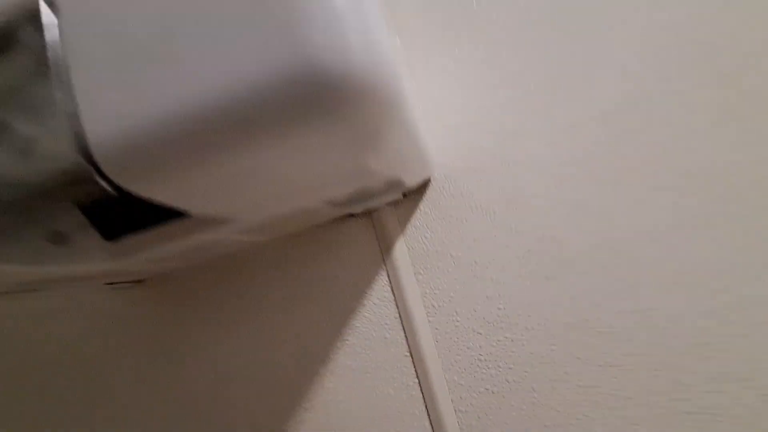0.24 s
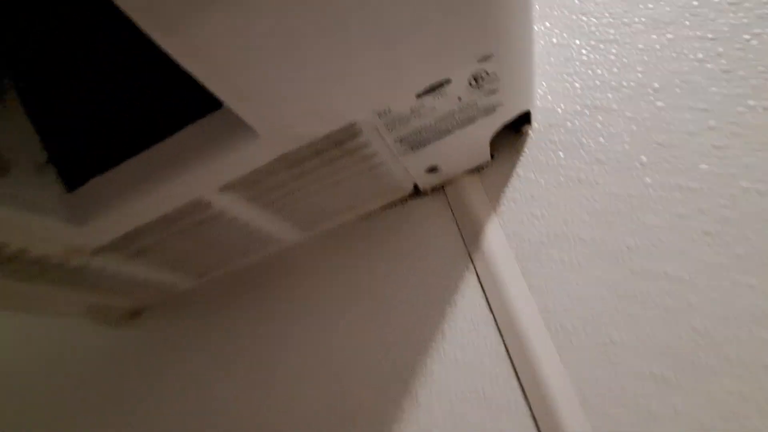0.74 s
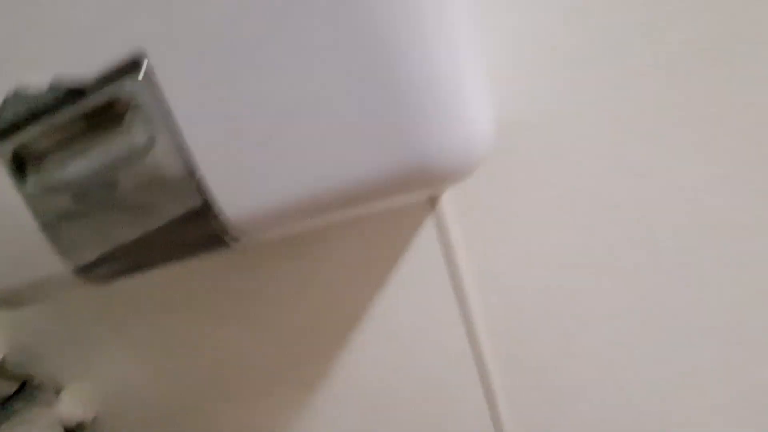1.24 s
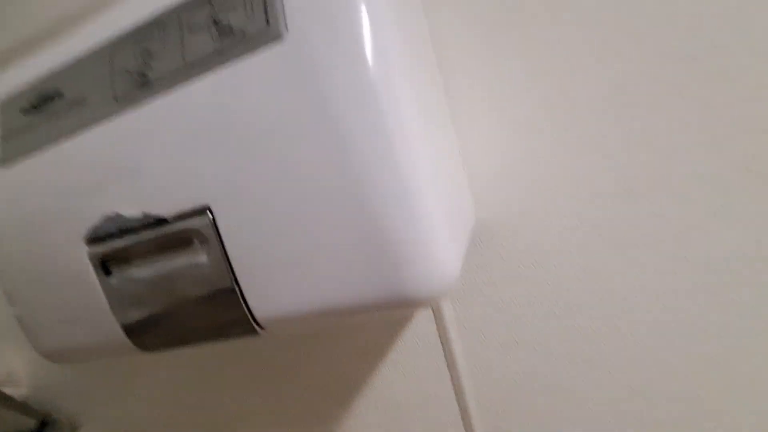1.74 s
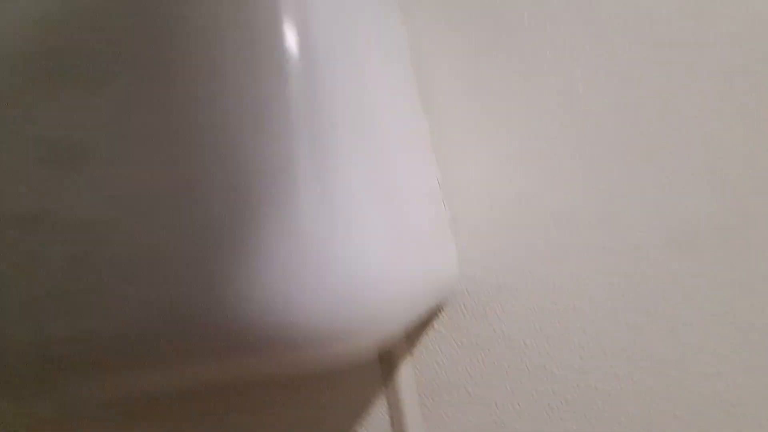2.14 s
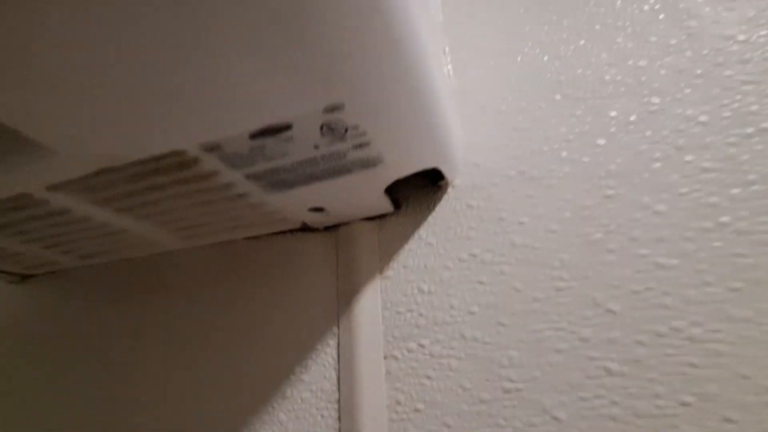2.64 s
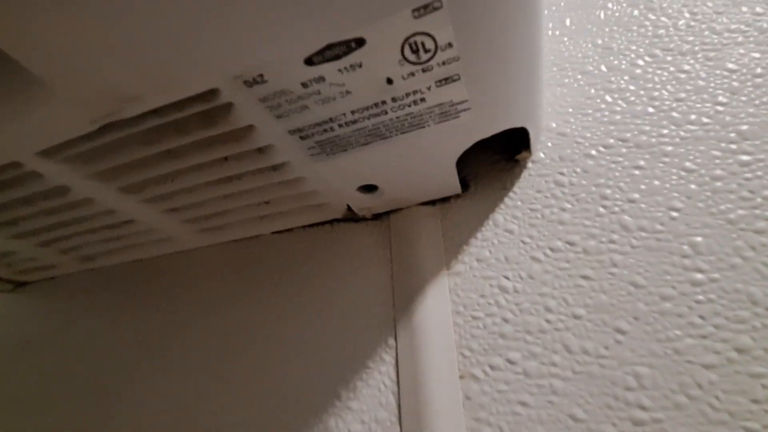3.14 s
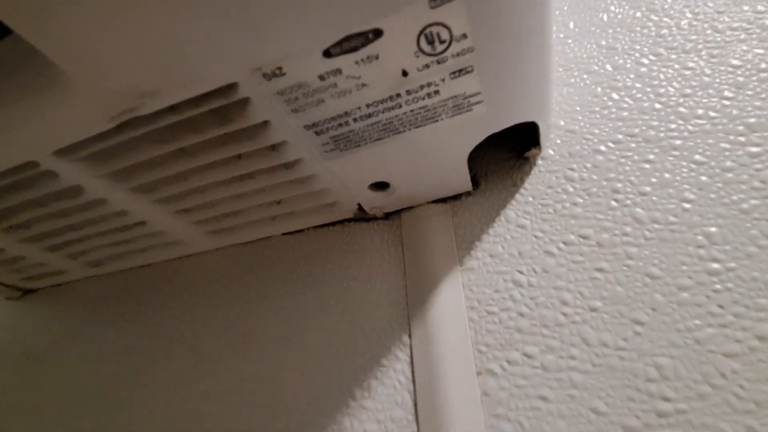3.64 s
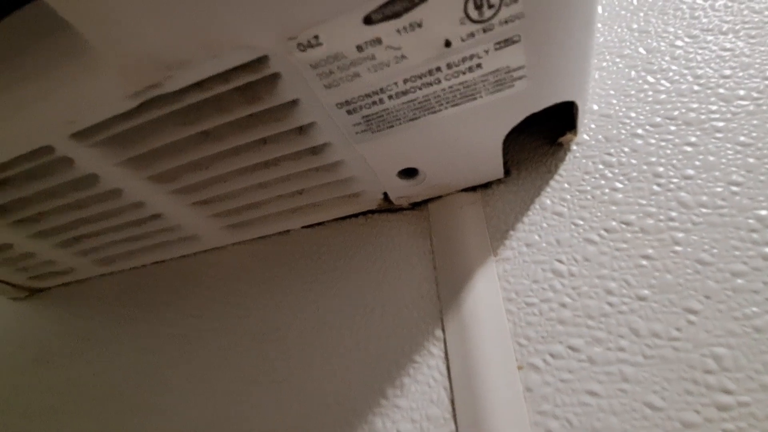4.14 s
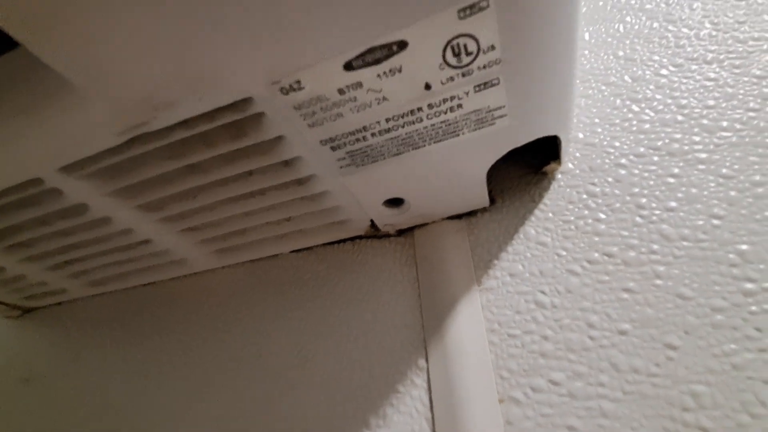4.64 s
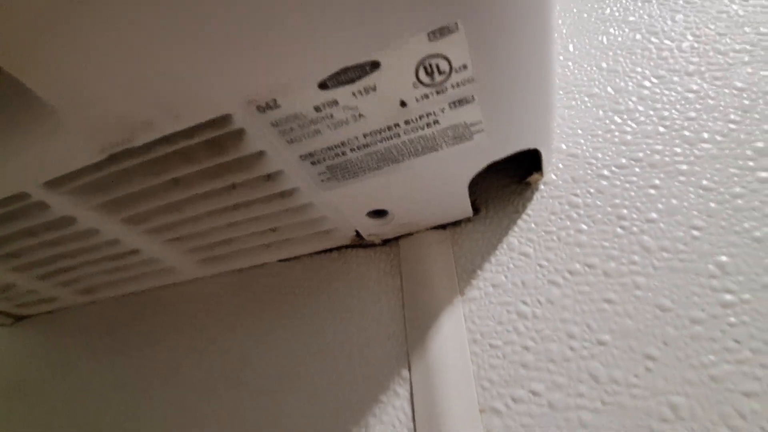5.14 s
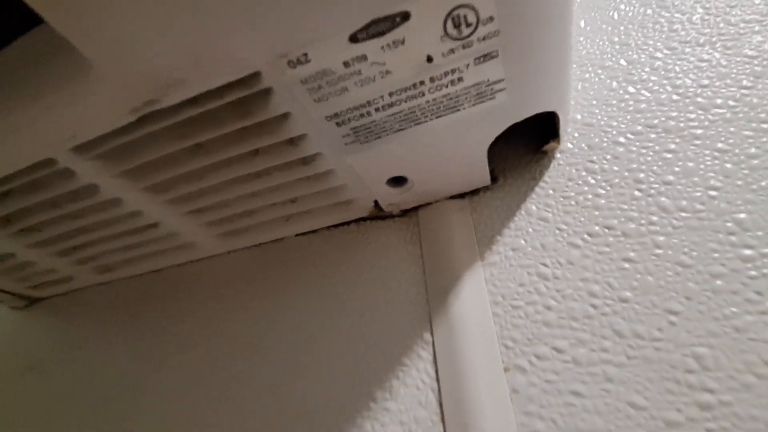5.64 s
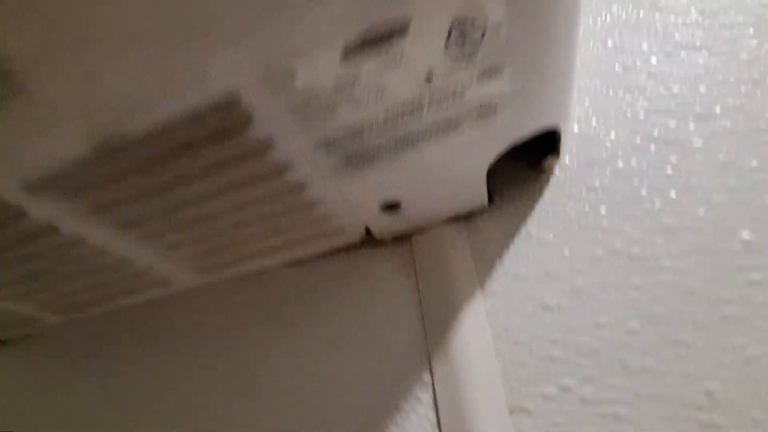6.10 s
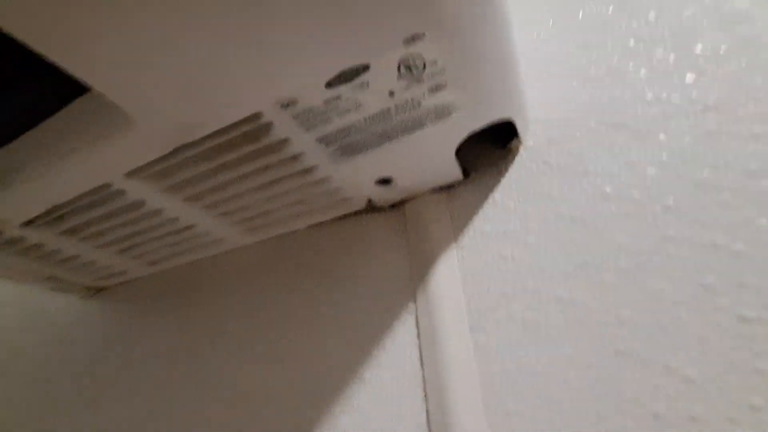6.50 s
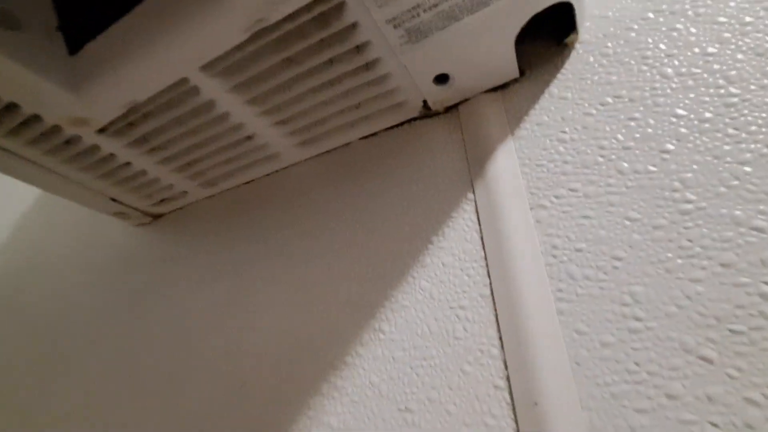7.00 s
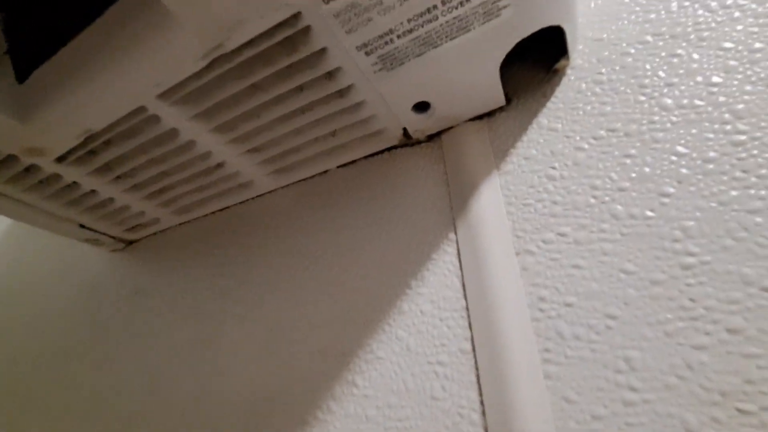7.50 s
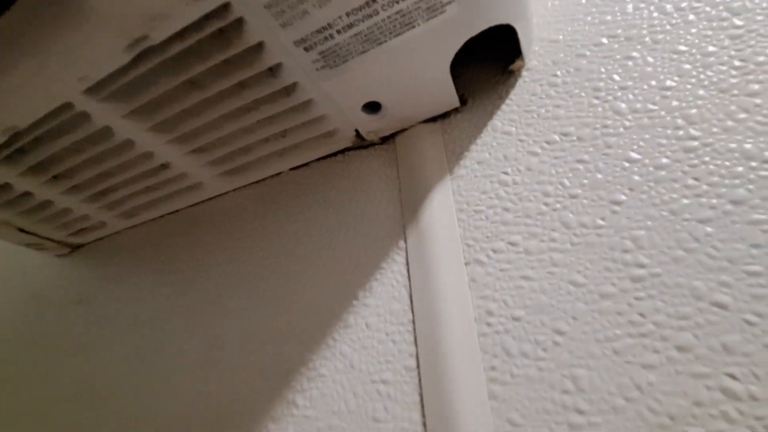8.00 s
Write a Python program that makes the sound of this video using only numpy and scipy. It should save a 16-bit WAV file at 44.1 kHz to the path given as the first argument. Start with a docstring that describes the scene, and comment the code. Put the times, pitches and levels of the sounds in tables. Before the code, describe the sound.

A hand dryer twice snaps on, blows with a buzzing rush of air and coasts down, over a ceiling fan's hum in a small restroom.

```python
"""Hand dryer in a small restroom.

An exhaust fan hums. Twice the wall dryer's motor snaps on, buzzes and rasps up to speed, blows, then coasts
down with its brushes swishing. A hand-held microphone moves about the housing, near the intake. Fingers rub its
case, gusts buffet it, and its gain control ducks the fan and lets it swell back."""
import sys
import numpy as np
from scipy import signal
from scipy.fft import rfft, irfft
from scipy.io import wavfile
from scipy.ndimage import minimum_filter1d

SR = 44100
rng = np.random.default_rng(int(sys.argv[2]) if len(sys.argv) > 2 else 0)


def transcribe(u):
    """Save the signal u as a 16-bit wav file named by the first command-line argument.

    u: samples, shape (n,) or (channels, n), limited to [-1, 1]; the rate is SR.
    q: integer samples, one column per channel.
    """
    v = np.clip(np.atleast_2d(u).T, -1, 1)
    q = np.round(v * 32767).astype(np.int16)
    wavfile.write(sys.argv[1], SR, q)


N = 364266
TIME_S, FREQS_HZ = np.arange(N) / SR, np.fft.rfftfreq(N, 1 / SR)
PULL_HZ, FAN_SHAFT_HZ, DRYER_TOP_HZ = 120.03, 24.01, 100.3  # magnetic pull is at twice the mains

# Noise spectra. Each row: frequency in Hz, relative density in dB.
FAN_AIR_DB = [(25, -87), (60, -59.5), (200, -64), (300, -56.5), (420, -61.5), (700, -62.5), (900, -75),
              (1400, -70.5), (2600, -79), (4700, -77.5), (7000, -86.5), (9300, -95.5), (12700, -92),
              (15800, -106)]
RUB_DB = [(30, -61), (150, -62), (450, -59), (900, -64), (1500, -61), (2800, -74.5), (4600, -66),
          (9000, -87), (12800, -69.5), (15800, -84)]
BUFFET_DB = [(20, -68), (45, -31.5), (70, -31), (120, -43), (250, -60), (600, -80), (2000, -120)]
RASP_DB = [(60, -48), (300, -49.5), (380, -44), (480, -39), (650, -57), (800, -48.5), (1300, -52),
           (2000, -61.5), (3300, -65), (3900, -59), (6200, -62.5), (9000, -67.5), (13000, -65),
           (15800, -74)]
BRUSH_DB = [(100, -64), (220, -64), (500, -60), (1500, -67.5), (3200, -75), (4200, -63), (6000, -65),
            (9000, -75.5), (12700, -69.5), (15800, -77)]
RUSH_DB = [(25, -63), (60, -46.5), (120, -34.5), (220, -29), (340, -38.5), (560, -40), (730, -44.5),
           (1300, -47.5), (3100, -53), (4000, -51), (5400, -51.5), (9200, -61), (12600, -56), (15800, -65)]
# Harmonics of the magnetic pull or of a shaft. Each row: multiple, relative level in dB.
FAN_HUM_DB = [(1, -25), (2, -35.5)]
FAN_BUZZ_DB = [(3, -32.5), (4, -42.5), (5, -37.5), (7, -57), (11, -47)]
FAN_SHAFT_DB = [(3, -31.5), (6, -40.5), (7, -44.5), (9, -44.5), (11, -42.5), (12, -38), (13, -43),
                (14, -31), (19, -46.5), (21, -60), (28, -49.5)]
MOTOR_BUZZ_DB = [(1, -34), (2, -42), (3, -20), (4, -16), (5, -47)]
BLOWER_WHINE_DB = [(1, -16.5), (2, -17.5), (3, -29.5), (4, -21.5), (5, -16.5), (6, -34), (10, -30),
                   (16, -25)]
# Resonances and dips. Each row: centre in Hz, width in Hz, gain in dB.
GRILLE_MODES = [(290, 44, 2.5), (930, 97, -2), (1070, 43, 2), (1306, 22, 8.5)]
FRAME_MODES = [(380, 34, 2.5), (491, 93, 4.5), (740, 120, 5), (1100, 130, 3.5), (1480, 70, -3),
               (1514, 67, 10), (1906, 130, 9), (3960, 380, 4), (5580, 250, 5), (6600, 320, 3)]
HOUSING_MODES = [(210, 13.7, 5), (287.4, 12, 5), (420, 22, 4.5), (481.3, 12, 11), (610, 37, -1),
                 (1098, 310, 6), (1185, 54, -14), (1380, 52, -3.5), (1588, 133, 8), (2320, 170, 4.5),
                 (4780, 460, 3), (8270, 600, 2), (12750, 900, 1)]
# Sound at the two microphone ports. Each row: frequency in Hz, coherence from 0 to 1,
# left phase lead in radians, left over right in dB.
FAN_STEREO = [(57, 0.63, -0.5, -1.5), (300, 1, 0.82, -2), (563, 0.52, -1.2, -2.5), (970, 0.21, -0.5, -4),
              (2180, 0.097, -8, -6), (4740, .05, -8.5, -15.5), (7500, .05, -23, -11), (9600, .03, -22, 8),
              (12500, .03, -36, -5), (15500, .03, -44, 6)]
DRYER_STEREO = [(50, 0.86, 1, 2), (216, 0.93, 0, 4), (490, 0.71, 0.55, -1), (860, 0.42, 1.38, -2.5),
                (1075, 0.39, 3.5, -2.5), (1570, 0, 4.5, 2.5), (2300, 0.29, 6, -1.5), (3620, 0.18, 10.5, -6),
                (5050, 0.11, 13.5, -10.5), (7800, 0.13, 19, -2.5), (9600, .03, 31, 14.5),
                (12600, 0.1, 37, 0.5), (15500, .03, 45, 13)]
# The housing's shadow on each port. Each row: frequency in Hz, gain in dB.
SHADOW_LEFT_DB = [(200, -3.5), (500, -5), (1100, 7), (1330, 2.5), (1620, -12), (2000, -6), (2500, -3.5),
                  (5000, -4.5), (8000, -6.5), (15000, -7)]
SHADOW_RIGHT_DB = [(200, 1.5), (500, -3), (1000, 4.5), (3000, 4.5), (5000, 2), (7500, -5), (10000, 6.5),
                   (13000, -16), (15500, -22)]
# Fan tones in the room's standing waves. Each row: time in seconds, hum gain in dB,
# buzz and shaft gain in dB.
STANDING_WAVES = [(.4, 2.5, -8), (1.2, -2.5, -11), (3, 7.5, 2), (3.8, 1.5, -3), (4.9, 3.4, 1),
                  (5.8, 1.5, -3.5), (8.26, 4.5, 1)]
# Microphone path. Each row: time in seconds, nearness gain in dB, height from 0 (under the dryer's
# grille) to 1 (facing the housing).
MIC_PATH = [(.65, -2, .1), (.87, -0.5, 0.26), (1.03, 0.5, 0.7), (1.29, -3, 0.63), (1.39, -2.5, 0.88),
            (2.14, -2, 0.85), (2.26, -.5, 0.5), (2.5, 1.5, 0.062), (3.6, 2.5, 0.06), (5.9, 1, 0.15),
            (6.2, 1, .02), (6.48, 2, 0.36), (7.6, 2.3, 0.23), (8.26, 1.5, 0.31)]
# Finger knocks. Each row: start in seconds, level in dB, decay in seconds, pitch in Hz,
# left over right in dB.
CASE_KNOCKS = [(0.0619, 6.5, 0.00037, 1260, 15), (0.0737, -13, .0014, 1150, 4)]
# Stray air. Each row: centre in seconds, half length in seconds, level in dB.
MIC_GUSTS = [(.36, 0.057, -13), (0.854, 0.084, -2), (1.32, .05, -6), (2.65, .5, -7), (6.35, 0.2, -7),
             (7.24, 0.61, 6)]
# Contacts closing. Each row: start in seconds, level in dB, decay in seconds.
SWITCH_SPITS = [(.616, -25, 0.0067), (5.873, -27, 0.004)]
# Dryer runs. Each row: on in seconds, off in seconds, starting current in dB, its hold in seconds.
DRYER_RUNS = [(.604, 2.707, 1.5, .2), (5.856, 7.646, 0, 0.68)]


def amp(db):
    """Decibels to gain."""
    return 10 ** (np.asarray(db) / 20)


def curve(rows, column=1):
    """One column of a time table, per sample."""
    rows = np.array(rows, float)
    return np.interp(TIME_S, rows[:, 0], rows[:, column])


def spectrum(rows):
    """Each column of a frequency table, per bin."""
    hz, *columns = np.transpose(rows)
    return np.array([np.interp(np.log(FREQS_HZ + 1), np.log(hz), c) for c in columns])


def resonance_db(modes):
    """Summed bell curves, per bin."""
    return sum(db / (1 + (2 * (FREQS_HZ - hz) / width_hz) ** 2) for hz, width_hz, db in modes)


def colour(x, db):
    """Filter by a gain per bin."""
    return irfft(rfft(x) * amp(db), N)


def low_pass(x, hz, order=4):
    """Zero-phase low-pass."""
    return irfft(rfft(x) / (1 + (FREQS_HZ / hz) ** order), N)


def noise(rows):
    """Two independent noises of a given spectrum."""
    return colour(rng.standard_normal((2, N)) * np.sqrt(SR / 2), spectrum(rows))


def wander(rate_hz):
    """Slow random drift, unit deviation."""
    drift = low_pass(rng.standard_normal(N), rate_hz)
    return drift / drift.std()


def tones(hz, harmonics, waver):
    """Harmonics, each wavering in level."""
    turns = np.cumsum(hz * np.ones(N)) / SR
    out = np.zeros(N)
    for multiple, db in harmonics:
        gain = amp(db) * (1 + waver * wander(1.9))
        out += gain * np.sin(2 * np.pi * (round(multiple) * turns + rng.random()))
    return np.sqrt(2) * out


def release(end_s, decay_s):
    """Envelope: full, then decaying."""
    return np.exp(-np.maximum(TIME_S - end_s, 0) / decay_s)


def burst(start_s, decay_s):
    """Envelope: a jump, then decay."""
    return (TIME_S >= start_s) * release(start_s, decay_s)


def tile_echoes(x, wet=0.34, decay_s=0.016, count=90):
    """Quick echoes off close, hard walls ripple the spectrum above the bass."""
    delays_s = rng.uniform(0.001, 0.03, (2, count))
    gains = rng.choice([-1, 1], delays_s.shape) * np.exp(-delays_s / decay_s)
    taps = np.zeros((2, N))
    np.put_along_axis(taps, (delays_s * SR).astype(int), gains, 1)
    taps /= np.linalg.norm(taps, axis=1, keepdims=True)
    echoes = rfft(taps) * FREQS_HZ / (FREQS_HZ + 600)
    return irfft(rfft(x) * (1 + wet * echoes), N)


def at_ports(noises, tone, stereo):
    """Bass reaches both ports alike; treble noise comes off the tiles, incoherent."""
    coherence, lead_rad, balance_db = spectrum(stereo)
    coherence = np.clip(coherence, 0, 1)
    shared, separate = rfft(noises)
    tone_bins = rfft(tone)
    left = (shared + tone_bins) * amp(balance_db)
    right_noise = coherence * shared + np.sqrt(1 - coherence ** 2) * separate
    right = (right_noise + tone_bins) * np.exp(-1j * lead_rad)
    return irfft(np.array([left, right]) / np.sqrt((1 + amp(balance_db) ** 2) / 2), N)


def exhaust_fan(throb=0.17, sharpness=6.7, fade_in_db=11, fade_in_s=0.064):
    """Mains hum and shaft tones over air that throbs once a turn; at the very start the fan sound is faint and
    quickly comes up to level."""
    hum_db, buzz_db = curve(STANDING_WAVES), curve(STANDING_WAVES, column=2)
    hum = tones(PULL_HZ, FAN_HUM_DB, waver=0.018) * amp(hum_db)
    buzz = tones(PULL_HZ, FAN_BUZZ_DB, waver=0.087) * amp(buzz_db)
    shaft = tones(FAN_SHAFT_HZ, FAN_SHAFT_DB, waver=0.074) * amp(0.25 * buzz_db)
    beat = np.exp(sharpness * (np.cos(2 * np.pi * FAN_SHAFT_HZ * TIME_S) - 1))
    air = colour(noise(FAN_AIR_DB), resonance_db(GRILLE_MODES))
    low_air = colour(air, spectrum([(200, 15), (600, -3), (1500, -6), (4000, -13)]))
    air += throb * (beat - beat.mean()) * low_air
    fade_in = amp(-fade_in_db * np.exp(-TIME_S / fade_in_s))
    return at_ports(tile_echoes(air), hum + buzz + shaft, FAN_STEREO) * fade_in


def handling(attack_s=0.028, port_db=(-5, 0), snap_gain=0.59, snap_hz=4200):
    """Fingers slide and knock on the microphone case; a knock is a short ring plus a snap."""
    grip = (1 - np.exp(-TIME_S / attack_s)) * release(end_s=0.21, decay_s=0.084)
    out = at_ports(noise(RUB_DB), np.zeros(N), DRYER_STEREO) * grip * amp(port_db)[:, None]
    for start_s, db, decay_s, hz, balance_db in CASE_KNOCKS:
        age_s = TIME_S - start_s
        ring = burst(start_s, decay_s) * np.sin(2 * np.pi * hz * age_s)
        snap = burst(start_s, decay_s / 4) * np.sin(2 * np.pi * snap_hz * age_s)
        out -= amp(db) * (ring + snap_gain * snap) * amp([[0], [-balance_db]])
    return out


def draught(lump_db=3, right_db=-19):
    """Gusts of stray air buffet mostly the left port."""
    gusts = sum(amp(db) * np.exp(-((TIME_S - mid_s) / half_s) ** 2) for mid_s, half_s, db in MIC_GUSTS)
    return noise(BUFFET_DB) * gusts * amp(lump_db * wander(17)) * amp([[0], [right_db]])


def switch():
    """Closing contacts spit thin treble."""
    envelope = sum(amp(db) * burst(start_s, decay_s) for start_s, db, decay_s in SWITCH_SPITS)
    spits = envelope * rng.standard_normal((2, N))
    return colour(spits, spectrum([(2000, 2), (7000, -7), (12000, 16), (15000, -4)]))


def rotor_pace(spin_up_s=0.24, coast_s=2.85, drag_s=0.92):
    """Share of top speed: the rotor spins up, then friction and air drag stop it."""
    pace = np.zeros(N)
    for on_s, off_s, _, _ in DRYER_RUNS:
        driven_s, coasting_s = np.clip(TIME_S - on_s, 0, off_s - on_s), np.maximum(TIME_S - off_s, 0)
        spin_up = 1 - np.exp(-driven_s / spin_up_s)
        friction = np.maximum(1 - coasting_s / coast_s, 0)
        pace += spin_up * friction / (1 + coasting_s / drag_s)
    return pace


def motor_current(attack_s=0.013, release_s=0.012, swell_db=6, swell_s=0.041, sag_db_per_s=13.5):
    """Current swells, holds, sags as the load eases, and dies at switch-off."""
    current = np.zeros(N)
    for on_s, off_s, db, hold_s in DRYER_RUNS:
        age_s = np.maximum(TIME_S - on_s, 0)
        gate = np.minimum(age_s / attack_s, 1) * release(off_s, release_s)
        sag_db = sag_db_per_s * np.maximum(age_s - hold_s, 0)
        current += gate * amp(db - swell_db * np.exp(-age_s / swell_s) - sag_db)
    return current


def motor(pace, flutter_depth=0.16, rough_db=1.44, swish_depth=0.57):
    """Current makes the brushes rasp and the iron buzz; brushes swish once a turn, even coasting."""
    current = motor_current()
    flutter = 1 + flutter_depth * np.sin(2 * np.pi * PULL_HZ * TIME_S)
    rasp = noise(RASP_DB) * current * flutter * amp(rough_db * wander(33))
    turns = np.cumsum(DRYER_TOP_HZ * pace) / SR
    high_spot = np.exp(3.5 * (np.cos(2 * np.pi * turns) - 1))
    swish = noise(BRUSH_DB) * pace ** 1.03 * (1 + swish_depth * high_spot)
    buzz = tones(PULL_HZ, MOTOR_BUZZ_DB, waver=0.16) * current ** 1.13 * pace ** 0.44
    return rasp + swish, buzz


def blower(pace, gust_db=0.5, tumble_db=1.0, split_hz=500):
    """Rush and whine grow steeply with speed; low eddies tumble more than the hiss."""
    air = noise(RUSH_DB)
    eddies = low_pass(air, split_hz)
    hiss = air - eddies
    rush = eddies * amp(-tumble_db * wander(26)) * pace ** 2.24 + hiss * pace ** 2.77
    rush *= amp(gust_db * wander(11))
    whine = tones(DRYER_TOP_HZ * pace, BLOWER_WHINE_DB, waver=0.18) * pace ** 8
    return rush, whine


def housing_shadow(direct, height):
    """The housing's edge hides each port as the microphone rises."""
    edge_height, blur = [[0.56], [0.66]], [[0.14], [0.092]]  # left, right
    shaded = colour(direct, np.vstack([spectrum(SHADOW_LEFT_DB), spectrum(SHADOW_RIGHT_DB)]))
    hidden = (1 + np.tanh((height - edge_height) / blur / 2)) / 2
    return direct + hidden * (shaded - direct)


def outlet_beam(x, height, beam_height=0.58, beam_width=0.43, split_hz=6300):
    """The outlet beams treble at one height; mainly the right port catches it."""
    base_db, beam_db = [[-0.5], [-3.5]], [[-0.5], [10]]  # left, right
    treble = x - low_pass(x, split_hz, order=8)
    in_beam = np.exp(-((height - beam_height) / beam_width) ** 2)
    return x + treble * (amp(base_db + in_beam * beam_db) - 1)


def dryer():
    """Blower and motor ring the housing and frame, heard from the moving microphone."""
    pace = rotor_pace()
    rush, whine = blower(pace)
    brushes, buzz = motor(pace)
    noises = colour(rush, resonance_db(HOUSING_MODES)) + colour(brushes, resonance_db(FRAME_MODES))
    direct = at_ports(tile_echoes(noises), whine + buzz, DRYER_STEREO)
    nearness_db, height = curve(MIC_PATH), np.clip(curve(MIC_PATH, column=2), 0, 1)
    return outlet_beam(housing_shadow(direct, height), height) * amp(nearness_db)


def scene():
    """Stereo sum at the microphone."""
    return exhaust_fan() + dryer() + draught() + switch() + handling()


def lag(x, tau_s):
    """One-pole smoother."""
    pole = np.exp(-1 / (tau_s * SR))
    return signal.lfilter([1 - pole], [1, -pole], x)


def record(dry, threshold_db=-21, quick_slope=0.23, slow_slope=0.39, hold_s=0.92, edge_hz=15780):
    """Gain control, a quick part plus a slow part that holds; then the band limit."""
    power_db = 10 * np.log10(lag((dry ** 2).mean(0), 0.0053) + 1e-12)
    over_db = np.maximum(power_db - threshold_db, 0)
    half_hold = round(hold_s * SR / 2)
    held_db = -minimum_filter1d(-over_db, 2 * half_hold + 1, origin=half_hold)  # trailing maximum
    slow_db = np.maximum(lag(held_db, 0.15), lag(held_db, 0.33))
    ducked = dry * amp(-quick_slope * over_db - slow_slope * slow_db)
    band_limit = signal.firwin(1535, edge_hz, window=("kaiser", 9), fs=SR)
    return signal.oaconvolve(ducked, band_limit[None], "same")


dry = scene()
out = record(dry)
transcribe(out)
```